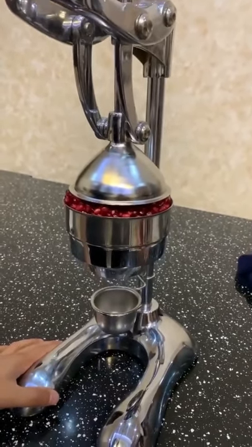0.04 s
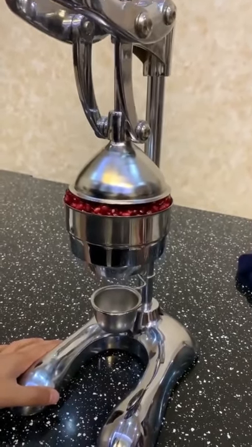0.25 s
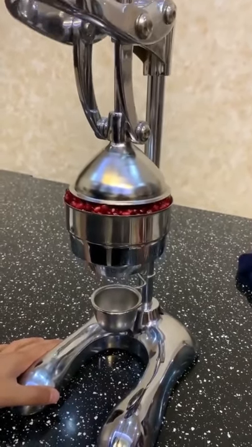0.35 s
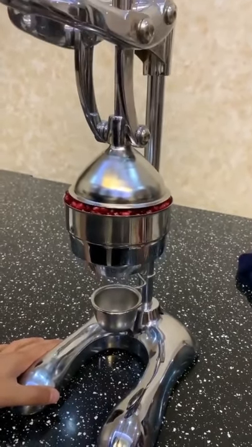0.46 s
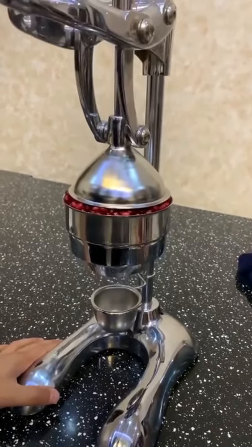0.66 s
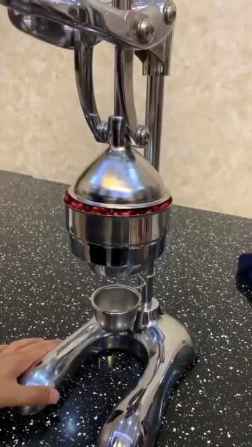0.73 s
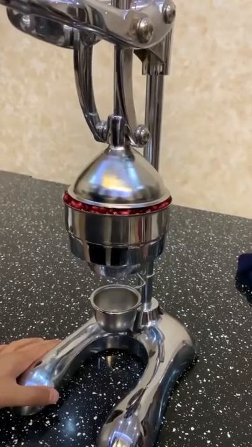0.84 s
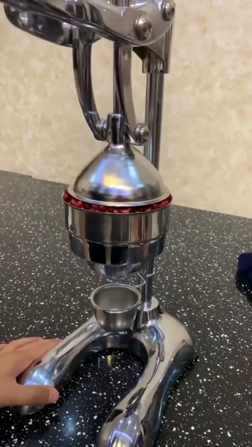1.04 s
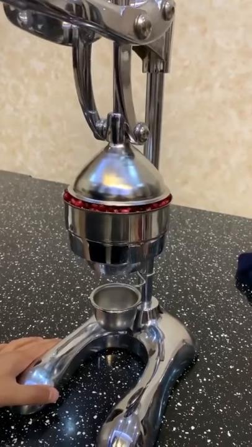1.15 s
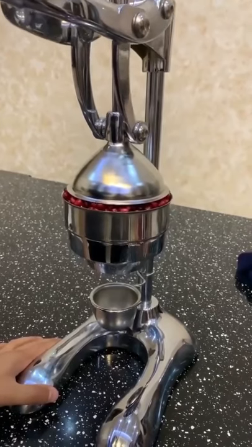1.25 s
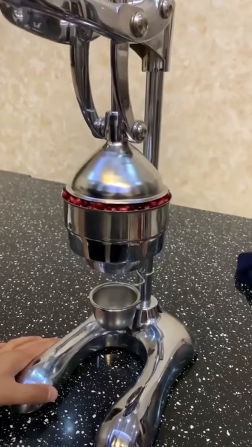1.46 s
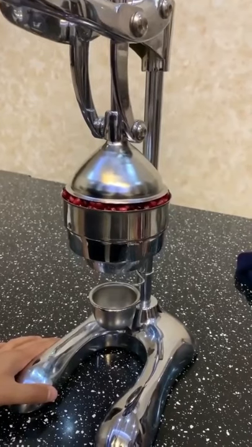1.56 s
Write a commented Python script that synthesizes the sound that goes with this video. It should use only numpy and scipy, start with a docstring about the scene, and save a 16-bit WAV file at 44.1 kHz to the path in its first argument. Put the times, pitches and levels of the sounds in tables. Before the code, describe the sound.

A metal fruit press clacks sharply once, then ticks faintly in a quiet kitchen.

```python
"""A faint tick, small rubs and a wet hiss come first: a metal lever press squeezing fruit on a kitchen
counter, close to one microphone. A quarter second in, its linkage slips: a sharp double clack rings
the frame, bumps the counter and dies away in the hard room. Then the joints tick and squeak faintly
and the pulp hisses as it gives. Behind it all lie room noise, an appliance's hum and a deep rumble."""
import sys
import numpy as np
from scipy import signal
from scipy.fft import rfft, irfft
from scipy.io import wavfile

SR = 44100
rng = np.random.default_rng(int(sys.argv[2]) if len(sys.argv) > 2 else 0)


def to_wav(sig):
    """Store sig (one row per channel, or 1-D mono) as 16-bit WAV at the path in sys.argv[1].

    Samples outside -1..1 are clipped; the rate is SR.
    """
    pcm = np.clip(np.atleast_2d(sig), -1, 1) * 32767
    pcm = np.round(pcm).astype(np.int16)
    wavfile.write(sys.argv[1], SR, pcm.T)  # frames by channels


N = 70560
TIME = np.arange(N) / SR

# Contacts of the slipping linkage. Each row: start in seconds, relative ring level in dB,
# relative crack level in dB, brightness in Hz.
CONTACTS = [(0.2361, -24, -19, 7600), (.23872, -10.5, -2, 12000), (.2413, -15.5, -14, 6400),
            (.24723, -12, -13.5, 8400), (.25067, -10, -4.5, 8600), (.25244, -6.5, -7.5, 5730),
            (.25433, -17.5, -11, 2920), (.26095, -12.5, -20, 2130)]
# Modes of the frame. Each row: frequency in Hz, relative level in dB, t60 in seconds.
FRAME_MODES = [(596.5, -17.5, 0.12), (1164, -24, 0.062), (1270, -25.5, 0.062), (1420, -38, 0.11),
               (1560, -33, 0.11), (1636, -5.5, .05), (1692, -4.5, 0.046), (1840, -8, .07),
               (2170, -15, 0.023), (2230, -12, .034), (2532, -11, 0.061), (3130, -14.5, 0.043),
               (3436, -5, 0.025), (3542, -11.5, 0.062), (3914, -11.5, 0.044), (6800, -34, 0.052),
               (7170, -21, 0.064)]
# The crack of metal on metal. Each row: frequency in Hz, relative level in dB.
CRACK_SPECTRUM = [(300, -36), (900, -23), (1600, 6.5), (2800, -2.5), (4200, -2.5), (4900, -6.5), (7600, 1),
                  (8600, -3.5), (9400, -12), (11000, -3.5), (12500, -31), (16000, -26)]
# Ticks of the joints. Each row: start in seconds, level in dB, centre and width in Hz, t60 in seconds.
JOINT_TICKS = [(0.013, -42.5, 3880, 1470, 0.022), (.924, -43, 3320, 156, 0.052),
               (.924, -39, 7900, 3000, 0.11), (1.2415, -32.5, 2070, 288, 0.048),
               (1.243, -43.5, 1290, 201, 0.068), (1.340, -40, 7900, 1220, 0.038),
               (1.386, -41.5, 1740, 302, .07)]
# Rubs of the post and joints. Each row: peak time in seconds, level in dB, half length in seconds,
# centre and width in Hz.
JOINT_RUBS = [(.118, -44, .018, 5550, 500), (.145, -48, .02, 160, 50), (.13, -47, .03, 1600, 700),
              (.215, -42, .02, 1700, 400), (.19, -46, .025, 620, 120), (.467, -40, .014, 1500, 900),
              (.93, -47, .01, 5550, 250), (1.025, -47, .014, 5900, 300), (1.53, -46, .011, 5900, 250)]
# Hisses of pulp. Each row: peak time in seconds, level in dB, half length in seconds.
PULP_SWELLS = [(0.137, -46, 0.026), (0.228, -47.5, 0.041), (0.92, -43.5, 0.021), (1.014, -48, 0.028),
               (1.127, -53.5, 0.039), (1.527, -45, 0.043), (1.595, -50, 0.017)]
# Colour of that hiss. Each row: frequency in Hz, relative level in dB.
PULP_SPECTRUM = [(300, -16.5), (1000, 6.5), (2000, 9), (2700, -6), (3500, 0), (4700, -12.5), (5700, -1),
                 (8000, 3), (10000, -10), (12000, -3), (15000, -47)]
# Colour of the kitchen's reverberation. Each row: frequency in Hz, relative level in dB.
ROOM_SPECTRUM = [(150, 12.5), (450, -3), (620, 1.5), (850, -12), (1220, 4), (1400, -4), (1650, -7.5),
                 (2000, 1.5), (2700, -9.5), (3500, -7), (4700, -14), (5400, -7), (6300, -10.5), (7600, -8),
                 (9500, -22), (11000, -13), (13000, -38)]
# How long the kitchen rings. Each row: frequency in Hz, t60 in seconds.
ROOM_DECAY = [(150, 0.38), (600, 0.75), (1600, 0.62), (3200, 0.43), (6000, 0.19), (12000, 0.41)]
# Steady room noise. Each row: frequency in Hz, relative level in dB.
ROOM_TONE_SPECTRUM = [(20, -6.5), (60, -10), (100, -10.5), (160, -6), (300, -5.5), (400, -9), (520, -1),
                      (650, -4.5), (820, -15.5), (950, -12.5), (1400, -17), (1900, -7), (2200, -15.5),
                      (2700, -29.5), (3400, -17.5), (4300, -28.5), (5800, -14), (6600, -20.5), (7600, -15),
                      (8500, -22), (10000, -28), (11800, -26), (12400, -45), (16000, -44)]
# Tones of an appliance. Each row: frequency in Hz, level in dB.
HUM_TONES = [(145.3, -67), (242.2, -69.5), (306.8, -59.5), (489.9, -53.5), (522.2, -56.5), (651.4, -58.5),
             (915.2, -60.5)]
# Rise and fall of the rumble. Each row: time in seconds, relative level in dB.
RUMBLE_LEVELS = [(0.0, -48), (0.016, -44.5), (0.346, -49), (0.998, -45), (1.136, -38.5), (1.438, -50),
                 (1.488, -40), (1.6, -51)]


def linkage_clack(crack_db=-9.5, crack_t60_s=0.053, crack_band_hz=(970, 12600)):
    """Each contact cracks and rings the frame, softer ones more dully. Gives ring, crack, bare snaps."""
    force, crack_power, snaps = np.zeros((3, N))
    for start, ring_db, contact_db, bright_hz in CONTACTS:
        softness = np.exp(-2 * np.pi * bright_hz / SR)
        click = np.maximum(1 - abs(TIME - start) * SR, 0)
        force += from_db(ring_db) * signal.lfilter([1 - softness], [1, -softness], click + 1e-18)
        crack_power += (from_db(contact_db) * decay(start, crack_t60_s)) ** 2
        snaps += from_db(contact_db) * click
    frame = sum(from_db(db) * ring(force, hz, t60) for hz, db, t60 in FRAME_MODES)
    for _ in range(2):  # the frame's ring falls away steeply below about 500 Hz
        frame = band(frame, 522, 13900)
    crack = from_db(crack_db) * np.sqrt(crack_power) * coloured(CRACK_SPECTRUM)
    return frame, band(crack, *crack_band_hz), band(snaps, *crack_band_hz)


def counter_thud(start_s=0.261, hz=183, attack_s=0.004, t60_s=0.052):
    """Bumped by the press, the counter gives one short low note."""
    age = np.maximum(TIME - start_s, 0)
    envelope = (1 - np.exp(-age / attack_s)) * decay(start_s, t60_s)
    return from_db(-23.5) * envelope * np.sin(2 * np.pi * hz * age)


def joint_ticks():
    """Tiny slips in the joints, each a brief burst in one resonance."""
    bursts = sum(friction(from_db(db) * decay(start, t60), hz, width)
                 for start, db, hz, width, t60 in JOINT_TICKS)
    return band(bursts, 500, 11100)


def joint_rubs():
    """The post and joints rub and squeak faintly under load, metal on metal."""
    return sum(friction(from_db(db) * swell(peak, half), hz, width)
               for peak, db, half, hz, width in JOINT_RUBS)


def pulp_hiss(grain_db=2.5, grains_per_s=300):
    """The pulp gives in soft swells of grainy hiss."""
    flow = sum(from_db(db) * swell(peak, half) for peak, db, half in PULP_SWELLS)
    hiss = coloured(PULP_SPECTRUM) * from_db(grain_db * drift(grains_per_s))
    return flow * unit_rms(hiss)


def kitchen_reverb(sound, gap_s=0.0078, longest_hold_s=0.081, hold_below_hz=7500):
    """Dense reflections reach the microphone just after the direct sound, hold, then die band by band."""
    edges = np.geomspace(100, 16000, 17)
    response = np.zeros(N)
    for low, high in zip(edges, edges[1:]):
        hz = np.sqrt(low * high)
        hold_s = longest_hold_s / (1 + (hz / hold_below_hz) ** 2)  # the treble goes first
        envelope = np.where(TIME < hold_s, 1, decay(hold_s, at_hz(ROOM_DECAY, hz)))
        response += from_db(at_hz(ROOM_SPECTRUM, hz)) * envelope * band_noise(low, high)
    response *= (TIME > gap_s) / np.sqrt(SR / 10)
    return from_db(-13) * signal.fftconvolve(sound, response)[:N]


def close_reflections(sound, depth_db=3, spacing_hz=69.46, above_hz=2200):
    """Surfaces nearby leave steady, irregular peaks and dips in the treble."""
    hz = np.arange(N + 1) * SR / (2 * N)
    ripple = np.interp(hz / spacing_hz, np.arange(N), rng.standard_normal(N))
    gain = from_db(depth_db * ripple * (hz > above_hz))
    return irfft(rfft(sound, 2 * N) * gain)[:N]


def appliance_hum(depth=0.94, wavers_per_s=9.02):
    """An appliance hums in the background, each tone wavering in level and phase."""
    hum = np.zeros(N)
    for hz, db in HUM_TONES:
        waver = 1 + depth * (drift(wavers_per_s) + 1j * drift(wavers_per_s))
        tone = np.exp(2j * np.pi * (hz * TIME + rng.random()))
        hum += from_db(db) * unit_rms(np.real(waver * tone))
    return hum


def rumble(band_hz=(29, 56.5), trim_db=-0.5):
    """Deep noise swells and sinks under the scene."""
    deep = band(band_noise(*band_hz), *band_hz)
    level_db = trim_db + np.interp(TIME, *np.transpose(RUMBLE_LEVELS))
    return from_db(level_db) * unit_rms(deep)


def room_tone():
    """The kitchen's quiet, steady noise, all around the microphone."""
    return from_db(-45.5) * coloured(ROOM_TONE_SPECTRUM)


def ring(force, hz, t60):
    """One mode: a unit click sets a sine of height 1 ringing."""
    radius, angle = from_db(-60 / (t60 * SR)), 2 * np.pi * hz / SR
    return signal.lfilter([0, np.sin(angle)], [1, -2 * radius * np.cos(angle), radius**2], force + 1e-18)


def friction(envelope, hz, width):
    """Friction noise drives one resonance; the rms follows the envelope."""
    noise = envelope * rng.standard_normal(N)
    return band(noise, hz - width / 2, hz + width / 2) * np.sqrt(SR / 2 / width)


def decay(start, t60):
    """Jumps to 1 at the start, then falls 60 dB every t60 seconds."""
    return (TIME >= start) * from_db(-60 * np.maximum(TIME - start, 0) / t60)


def swell(peak_s, half_s):
    """A bell-shaped rise and fall."""
    return np.exp(-0.5 * ((TIME - peak_s) / half_s) ** 2)


def drift(per_s):
    """A random wander with a spread of about 1."""
    return np.interp(TIME * per_s, np.arange(N), rng.standard_normal(N))


def coloured(spectrum):
    """Steady noise of a given colour, rms 1."""
    gain = from_db(at_hz(spectrum, np.arange(N // 2 + 1) * SR / N))
    return unit_rms(irfft(rfft(rng.standard_normal(N)) * gain, N))


def band_noise(low_hz, high_hz):
    """One band of white noise, its filter already settled."""
    return band(rng.standard_normal(N + SR // 2), low_hz, high_hz)[-N:]


def band(x, low_hz, high_hz):
    """Band-pass."""
    return signal.sosfilt(signal.butter(2, [low_hz, high_hz], "band", fs=SR, output="sos"), x + 1e-18)


def at_hz(table, hz):
    """Read a table on a log-frequency axis."""
    table_hz, values = np.transpose(table)
    return np.interp(np.log(hz + 1), np.log(table_hz), values)


def from_db(db):
    """Decibels to gain."""
    return 10 ** (np.asarray(db) / 20)


def unit_rms(x):
    """Scale to rms 1."""
    return x / np.sqrt(np.mean(x ** 2) + 1e-20)


def scene():
    """The press up close with the kitchen behind it, in mono."""
    frame, crack, snaps = linkage_clack()
    press = frame + counter_thud() + joint_ticks()
    reverb = kitchen_reverb(press + from_db(30) * snaps)  # the contacts' sharp edges excite the room
    around = reverb + pulp_hiss() + appliance_hum() + rumble() + room_tone()
    return (press + crack + joint_rubs() + close_reflections(around))[None]


def record(dry, ceiling=0.9, stop_hz=16800):
    """At the microphone, overload rounds the loudest peaks; the very top is cut."""
    rounded = dry / (1 + (dry / ceiling) ** 8) ** (1 / 8)
    return signal.sosfilt(signal.cheby2(12, 70, stop_hz, fs=SR, output="sos"), rounded)


dry = scene()
out = record(dry)
to_wav(out)
```